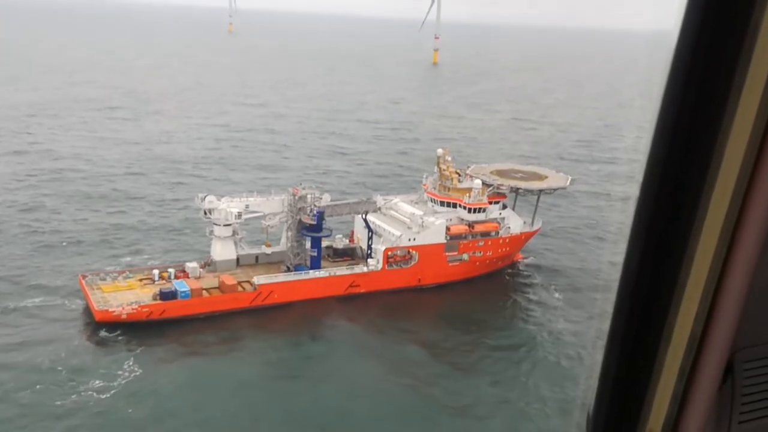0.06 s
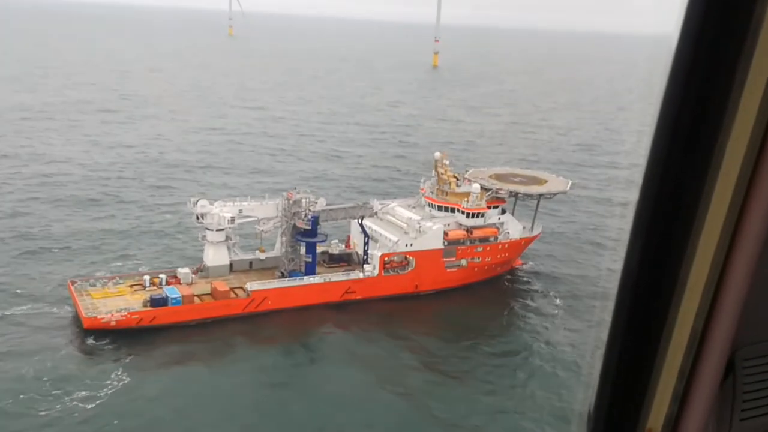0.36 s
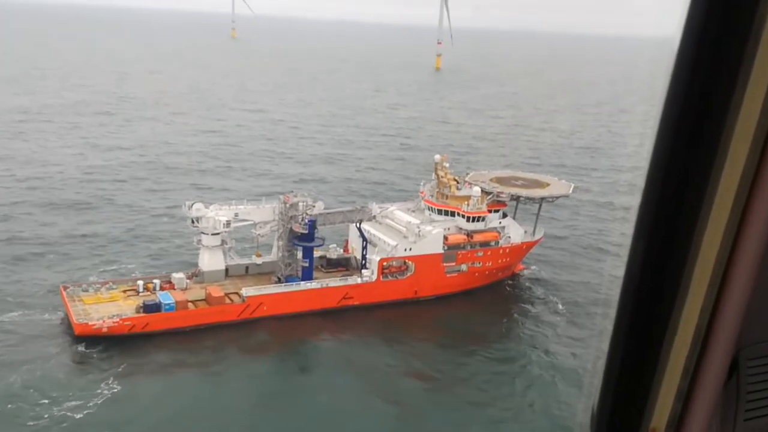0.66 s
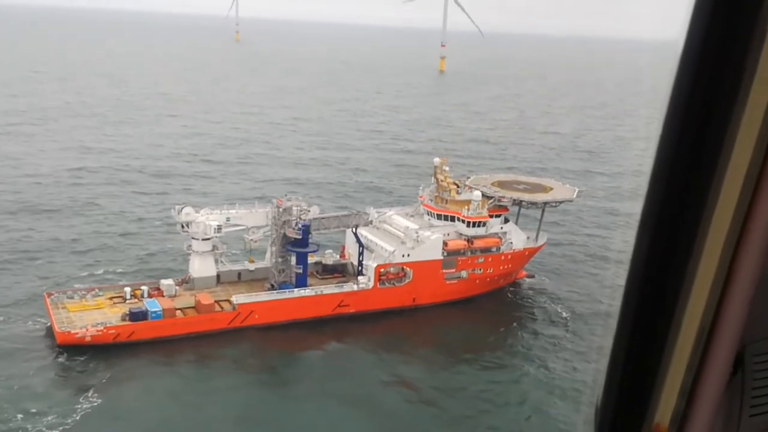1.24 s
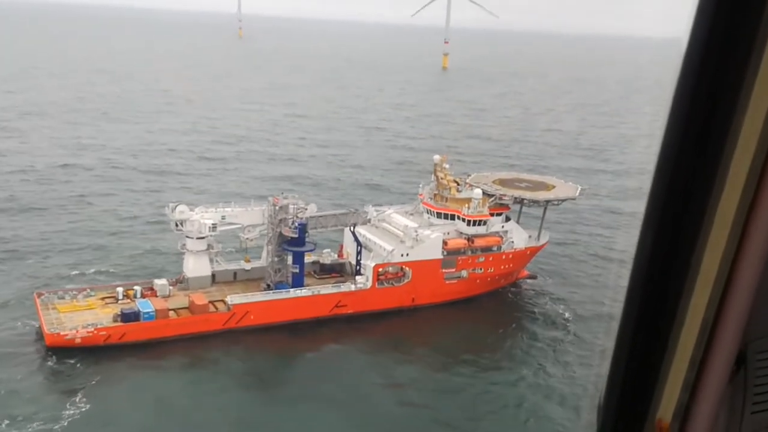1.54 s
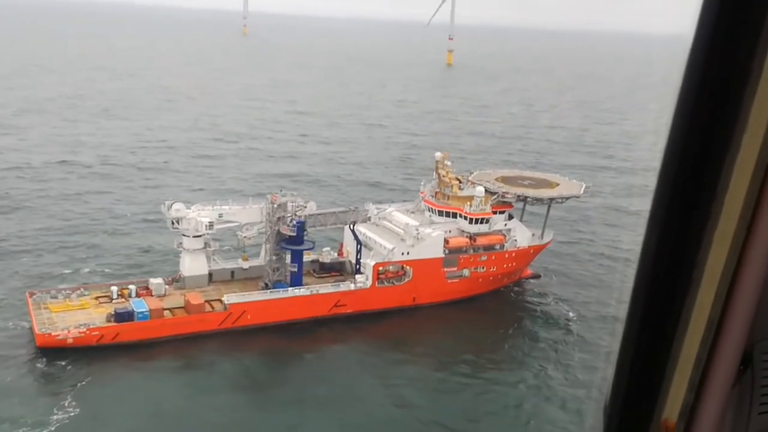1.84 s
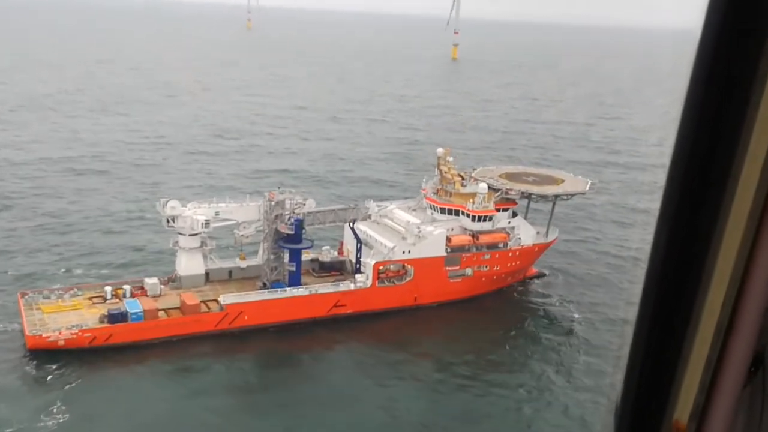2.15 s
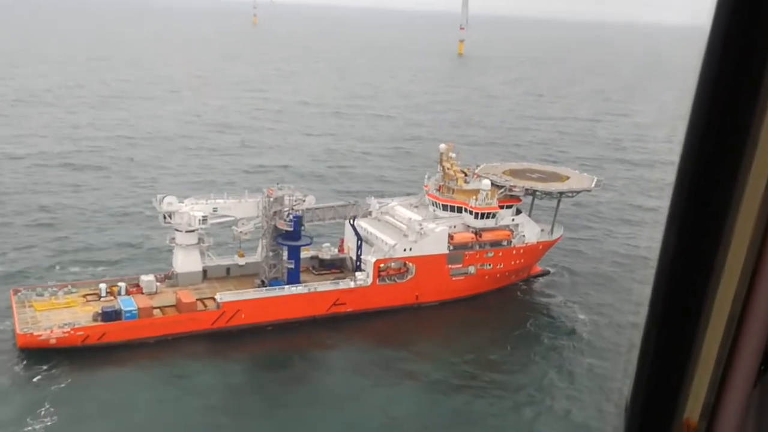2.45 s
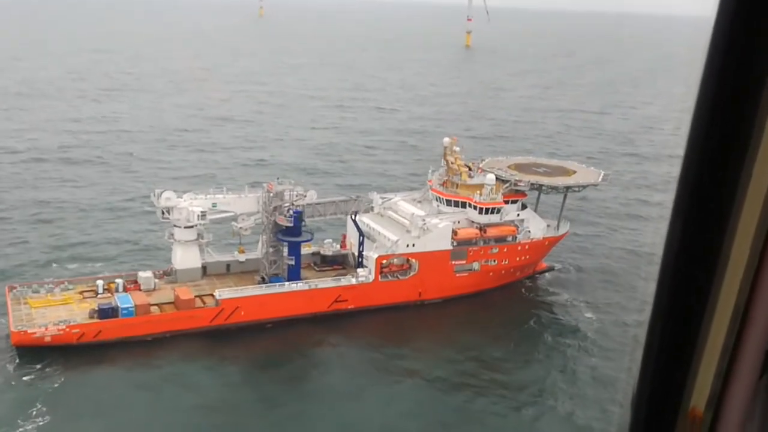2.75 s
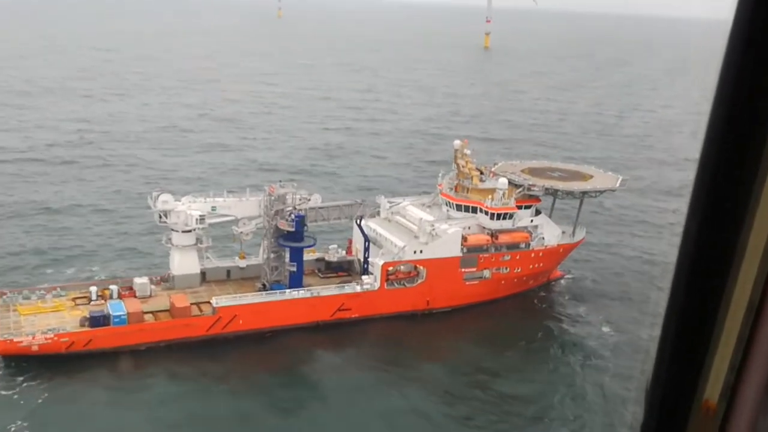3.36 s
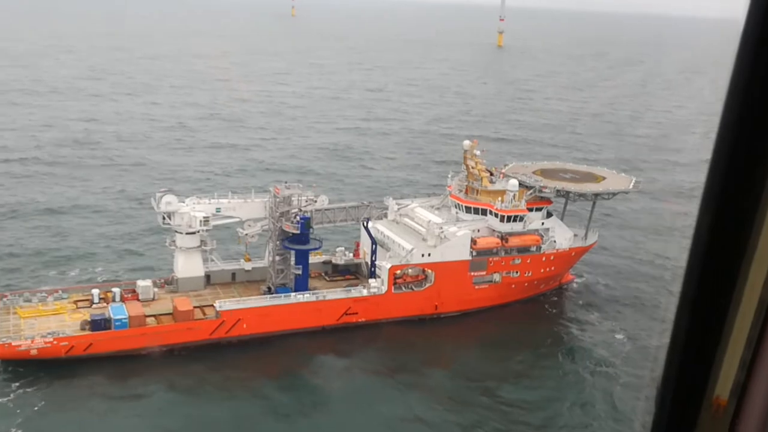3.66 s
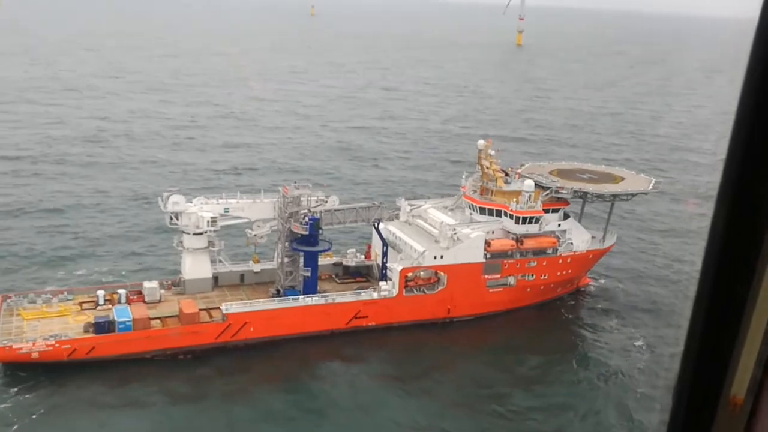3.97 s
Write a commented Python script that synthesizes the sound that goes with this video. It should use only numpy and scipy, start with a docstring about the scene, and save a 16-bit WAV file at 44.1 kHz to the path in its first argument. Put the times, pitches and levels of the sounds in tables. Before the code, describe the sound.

Steady helicopter cabin noise: high gear whine over rapid rotor thumping and rushing air.

```python
"""Five helicopter rotor blades thump on the cabin, heard from inside while cruising over the sea.
Each passing blade gives the cabin a push. The meshing teeth of the gearbox sing a loud whine, two
close tones that beat against each other, and softer ones; the rotor makes them flutter, which adds
side tones. Behind them rushing air roars, a seal hisses and the turbines whistle faintly.
Halfway through, it all gets a bit quieter."""
import sys
import numpy as np
from scipy import signal
from scipy.io import wavfile

SR = 44100
rng = np.random.default_rng(int(sys.argv[2]) if len(sys.argv) > 2 else 0)


def generate_wav(sig):
    """Save sig (samples, or channels by samples) to the path in sys.argv[1] as 16-bit PCM at SR."""
    pcm = np.round(np.clip(np.atleast_2d(sig).T, -1, 1) * 32767).astype(np.int16)
    wavfile.write(sys.argv[1], SR, pcm)


N = 176400
T = np.arange(N) / SR
BLADES, BLADE_HZ, FIRST_BLADE_S = 5, 28.93, 0.0153  # BLADE_HZ counts blade passes per second
FLUTTER_HZ = 8.7


def from_db(db):
    """Turn decibels into a gain."""
    return 10 ** (np.asarray(db) / 20)


def unit_power(x):
    """Scale to an average power of 1."""
    return x / np.sqrt(np.mean(np.abs(x) ** 2) + 1e-20)


def in_time(rows):
    """Read a table's columns at every sample."""
    times, *columns = np.transpose(rows)
    return [np.interp(T, times, c) for c in columns]


def at_hz(rows, hz):
    """Read a table's columns at one frequency."""
    freqs, *columns = np.transpose(rows)
    return [np.interp(np.log(hz), np.log(freqs), c) for c in columns]


def drift(hz):
    """A smooth random wobble of size about 1, mostly slower than hz."""
    step = 40
    pole = np.exp(-2 * np.pi * hz * step / SR)
    noise = rng.standard_normal(N // step + 2002)
    slow = signal.lfilter([1], [1, -2 * pole, pole * pole], noise)[2000:]
    return np.interp(np.arange(N) / step, np.arange(len(slow)), unit_power(slow))


def pan(db):
    """Left and right gains, with the left louder by db."""
    return unit_power(from_db([[db / 2], [-db / 2]]))


def blade_wave(delay_s, multiple=1):
    """A wave that peaks delay_s after each blade passes."""
    return np.cos(2 * np.pi * multiple * BLADE_HZ * (T - FIRST_BLADE_S - delay_s))


def flutter():
    """A wobble that is partly random and partly repeats with each rotor turn."""
    times = np.linspace(0, N / SR, N // 40)
    per_turn = np.arange(-15, 16)
    weight = np.where(per_turn % BLADES, 0.27, 1)  # multiples of the blade rate count most
    weight = weight * (per_turn != 0) / np.hypot(1, per_turn / BLADES)
    cycles = np.outer(per_turn * BLADE_HZ / BLADES, times) + rng.random((len(per_turn), 1))
    repeating = unit_power((weight[:, None] * np.exp(2j * np.pi * cycles)).sum(0))
    chance = drift(FLUTTER_HZ) + 1j * drift(FLUTTER_HZ)
    return unit_power(np.interp(T, times, repeating) + 0.74 * chance)


def tone(cycles, lead, depth):
    """A tone that flutters differently in each ear, the left ahead by lead radians; play its .real."""
    steady = np.sqrt(2) * np.exp(2j * np.pi * (cycles + rng.random()))
    return np.array([steady * (np.exp(1j * phase) + depth * flutter()) for phase in (lead, 0)])


# The roar from bass to treble: f/Hz, level/dB, pan/dB, how alike the two ears are (-1 to 1)
ROAR_BANDS = [(20, -64, 2, 0.99), (45, -51.5, -5, 0.83), (71, -47, 2.5, 1), (112, -38.5, -0.3, 0.99),
              (163, -43, 1.5, 1), (221, -44.5, -1.3, 0.92), (283, -50, -1.5, 0.99), (362, -52.5, -2, 0.68),
              (420, -58, -7, -0.064), (522, -63, -6, 0.11), (655, -63, -9, -0.13), (754, -60, -1.5, -0.44),
              (853, -54.5, -5, 0.15), (1016, -60.5, -10, -0.48), (1250, -60, -3, 0.24),
              (1550, -63.5, 1.5, 0.34), (1870, -62, 3.5, -0.45), (2110, -63.5, -5, -0.024),
              (2320, -59, 9.5, 0.17), (2600, -67, -4, -0.26), (2950, -69.4, -11, 0.1),
              (3300, -73.5, -7.5, 0.43), (3800, -73.5, -3.5, 0.18), (4300, -77, -4, -0.088),
              (4690, -73, -7, -0.2), (5300, -79, 2, 0.06), (6300, -83.5, 0.5, -0.03),
              (7660, -88, 2.4, 0.01), (10000, -89, 0.5, -0.014), (12500, -91, 4, 0.01),
              (15500, -92, -5, -0.0)]
# How the roar pulses with each blade: f/Hz, depth (0-1), delay/s
BLADE_PULSE = [(150, 0, -0.0078), (400, 0.01, -0.0066), (1200, 0.27, -.012), (5000, 0.14, .013),
               (8500, 0, .013), (11000, 0.16, 0.017), (14000, 0.05, 0.021)]

def air_roar():
    """Swirling air and the engines make a wide noise that pulses as the blades pass."""
    out, edges = 0, 20 * 2 ** (np.arange(50) / 5)  # five bands per octave
    white = rng.standard_normal((2, 2, N)) * np.sqrt(SR / 2)
    for k, (low, high) in enumerate(zip(edges, edges[1:])):
        band = signal.butter(3, [low, high], "band", fs=SR, output="sos")
        shared, opposite = signal.sosfilt(band, white[k % 2])
        centre_hz = np.sqrt(low * high)
        db, pan_db, alike = at_hz(ROAR_BANDS, centre_hz)
        depth, delay_s = at_hz(BLADE_PULSE, centre_hz)
        noise = np.sqrt((1 + alike) / 2) * shared + np.sqrt((1 - alike) / 2) * opposite * [[1], [-1]]
        gain = from_db(db + 0.5 + 1.5 * drift(hz=9.8))
        out = out + noise * pan(pan_db) * gain * (1 + depth * blade_wave(delay_s))
    return out


def seal_hiss(hz=10950, width_hz=370, db=-56.5):
    """Air leaks through a seal in a thin hiss that puffs with each blade."""
    b, a = signal.iirpeak(hz, hz / width_hz, fs=SR)
    hiss = unit_power(signal.lfilter(b, a, rng.standard_normal((2, N))))
    _, delay_s = at_hz(BLADE_PULSE, hz)
    return from_db(db) * hiss * (1 + .35 * blade_wave(delay_s))


# Turbine whistles: f/Hz, level/dB, pan/dB, left lead/rad
WHISTLES = [(5510, -61, -2, -.1), (6674, -56, 1, -2.9), (7800, -59, 9, -2.2), (13353, -65, -2, 2.2)]

def turbines(wander_hz=1.8):
    """The spinning turbines make thin whistles that wander slightly in pitch."""
    out = 0
    for hz, db, pan_db, lead in WHISTLES:
        cycles = np.cumsum(hz + wander_hz * drift(hz=1.94)) / SR
        out = out + from_db(db) * pan(pan_db) * tone(cycles, lead, depth=0.43).real
    return out


def surging_gear(shaft_s, hz=4903, wander_hz=6.66, peak_s=.028, rise_db_per_s=0.1):
    """A high gear tone swells twice per rotor turn, first strongly, then weakly."""
    turn = 2 * np.pi * BLADE_HZ / BLADES * (T - peak_s)
    swell = 1 + .7 * np.cos(2 * turn) + .35 * np.cos(turn)
    cycles = hz * shaft_s + np.cumsum(wander_hz * drift(FLUTTER_HZ)) / SR
    surge = unit_power(swell * tone(cycles, lead=np.pi, depth=.3).real)
    return from_db(-43.5 + rise_db_per_s * T) * pan(db=-9) * surge


# Softer gear tones, plus side tones where the rotor makes the main whine and twin tones flutter:
# f/Hz, level/dB, pan/dB, left lead/rad, flutter (0-1)
SOFT_TONES = [(452, -47, -5, -1.4, .2), (673, -38, -7, -2.4, .15), (729, -43, -3, 3, .2),
              (794, -46, -9, 2.8, .2), (850, -41, -6, 1.5, .3), (881, -45, -8, 2, .3),
              (1235, -46, -4, 2, .5), (1346, -40, 3, -1.9, .2), (1394, -45, -5, .6, .3),
              (1441, -43, -1, .1, .6), (1934, -47, 4, -1.1, .5), (1977, -48, 5, -.2, .3),
              (2091, -44, 8, 1.9, .3), (2233, -45, -2, -.9, .4), (2350, -45, 1, 1.1, .3),
              (2459, -42, 0, 1.8, .3), (2471, -34.5, -5, 2.4, .25), (2725, -49, -8, -2.6, .4),
              (2755, -42, 1, 3, .3), (3112, -50, -6, -.7, .4), (3282, -54, -2, .8, .5),
              (3366, -52, -11, 2, .5), (4078, -48.5, -10, 2.8, .3), (4102, -48.5, -13, -2.9, .3),
              (4583, -47.5, -4, 2.2, .4), (4667, -56, 1, 1.2, .4)]

def soft_tones(shaft_s):
    """Quiet gear tones and the side tones of the rotor's flutter all follow the shaft's speed."""
    return sum(from_db(db + .7) * pan(pan_db) * tone(hz * shaft_s, lead, depth).real
               for hz, db, pan_db, lead, depth in SOFT_TONES)


# Twin tones and their octave: pitch multiple, level/dB, pan/dB, left lead/rad, flutter (0-1)
TWIN_TONES = [(1, -26, -3, 2.7, .14), (2, -39, 6, 1.1, .5)]

def twin_gears(shaft_s, hz=820.4, beat_hz=3.1, peak_s=.2):
    """Two close gear tones, one from each engine, throb as they slip in and out of step."""
    out, second = 0, from_db([[4], [-8]])  # the second twin is louder on the left, softer on the right
    for multiple, db, pan_db, lead, depth in TWIN_TONES:
        slip = np.exp(2j * np.pi * multiple * beat_hz * (T - peak_s))
        beat = (1 + second * slip) / np.hypot(1, second)
        first = tone(multiple * hz * shaft_s, lead, depth)
        out = out + from_db(db) * pan(pan_db) * (beat * first).real
    return out


# The whine at each ear: t/s, left level/dB, right level/dB, left lead/rad
WHINE_AT_EARS = [(0, -21, -33, -1.35), (1.0, -21.5, -34, -.8), (1.6, -24, -33.5, -0.64),
                 (2.0, -24.5, -27.5, -1), (2.35, -23.5, -22.5, -0.99), (2.85, -22, -27, -1.0),
                 (3.2, -23, -23, -1.4), (3.65, -21.5, -21.5, -1.75), (4, -20, -20.5, -1.5)]

def main_whine(pitch_hz):
    """The main gears whine; shifting standing waves move the sound from the left towards the middle."""
    left_db, right_db, lead = in_time(WHINE_AT_EARS)
    return from_db([left_db, right_db]) * tone(np.cumsum(pitch_hz) / SR, lead, depth=.17).real


# Pitch of the main gears: t/s, f/Hz
GEAR_PITCH = [(0.0, 2292), (2.82, 2289), (4.0, 2294)]

def gearbox():
    """All the gearbox's tones rise and fall slightly with the speed of the shaft."""
    pitch_hz, = in_time(GEAR_PITCH)
    shaft_s = np.cumsum(pitch_hz / pitch_hz.mean()) / SR  # a clock that runs at the shaft's pace
    return main_whine(pitch_hz) + soft_tones(shaft_s) + twin_gears(shaft_s) + surging_gear(shaft_s)


# The deep tones that make up a thump: multiple of the blade rate, level/dB
THUMP_TONES = [(1, -19.5), (2, -26), (3, -25.5), (4, -39), (5, -25), (7, -26.5)]
# How the thumping swells and eases: t/s, level/dB
THUMP_SWELL = [(0, -1), (.55, -0.5), (.8, 2), (1.05, -1), (1.45, 1.5), (1.8, -.5), (2.4, -2), (3.2, 0),
               (4, -0.5)]

def rotor_thump(lag_s=.0006):
    """Each passing blade pushes on the cabin; the higher tones come later and are less steady."""
    out = 0
    for multiple, db in THUMP_TONES:
        waver = unit_power(1 + .11 * multiple * drift(hz=10.8))
        push = np.sqrt(2) * blade_wave(lag_s * (multiple - 1), multiple)
        out = out + from_db(db) * waver * push
    swell_db, = in_time(THUMP_SWELL)
    return from_db(swell_db) * out


def scene():
    """Gears, rotor, air and turbines mix in the cabin."""
    return gearbox() + rotor_thump() + air_roar() + seal_hiss() + turbines()


# Loudness of the whole sound: t/s, level/dB
OVERALL_LEVEL = [(0, -1), (1.91, -0.5), (1.94, -2.5), (4, -3)]

def record(dry, ceiling=.85, cutoff_hz=15750):
    """Step the level down halfway, round off the tallest peaks and cut the highest treble."""
    level_db, = in_time(OVERALL_LEVEL)
    x = dry * from_db(level_db)
    rounded = x / (1 + (x / ceiling) ** 10) ** .1
    return signal.sosfilt(signal.ellip(12, .1, 80, cutoff_hz, fs=SR, output="sos"), rounded)


dry = scene()
out = record(dry)
generate_wav(out)
```